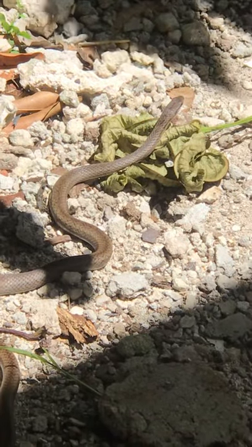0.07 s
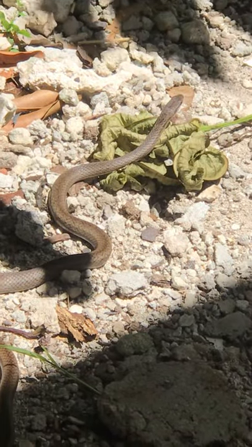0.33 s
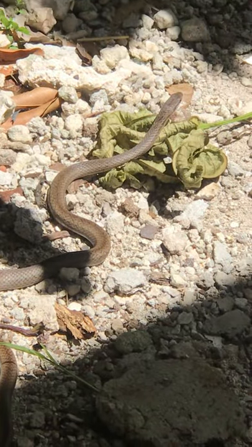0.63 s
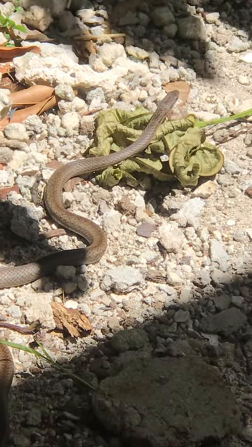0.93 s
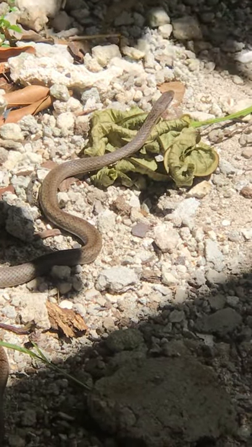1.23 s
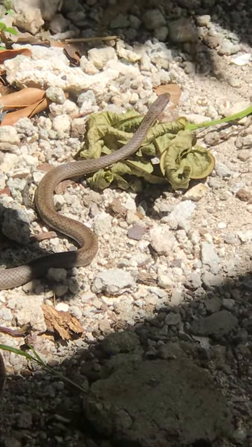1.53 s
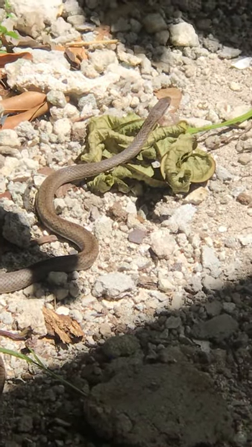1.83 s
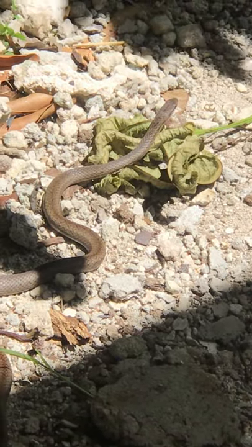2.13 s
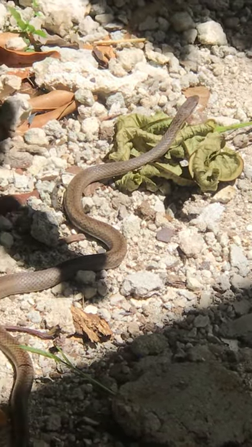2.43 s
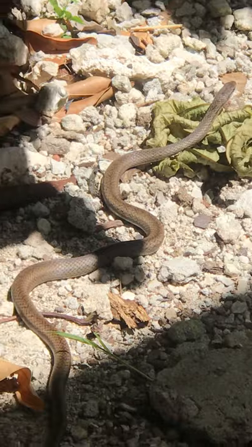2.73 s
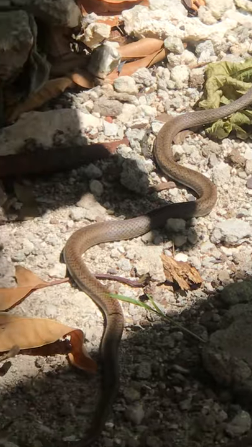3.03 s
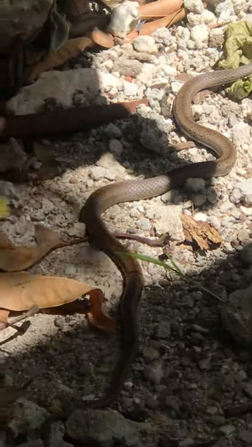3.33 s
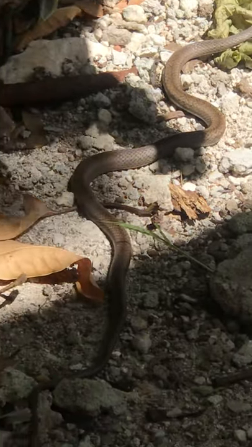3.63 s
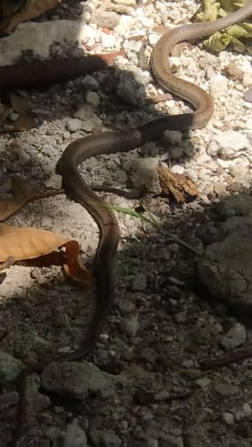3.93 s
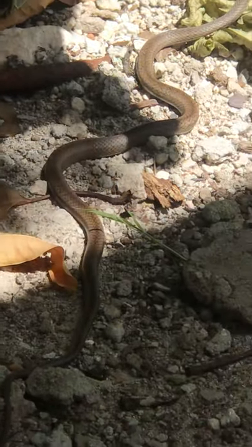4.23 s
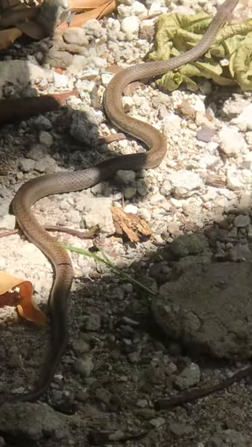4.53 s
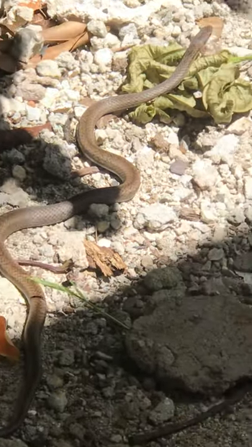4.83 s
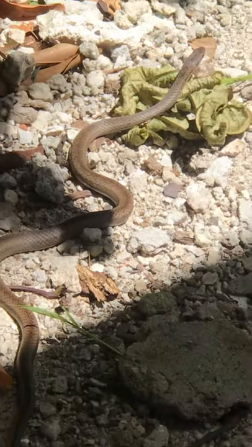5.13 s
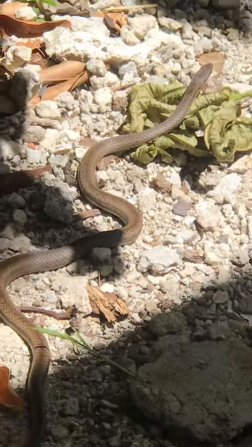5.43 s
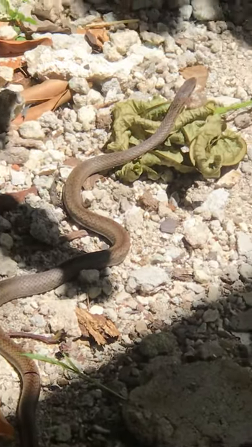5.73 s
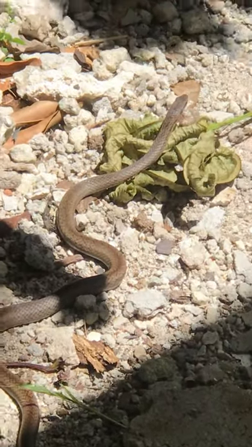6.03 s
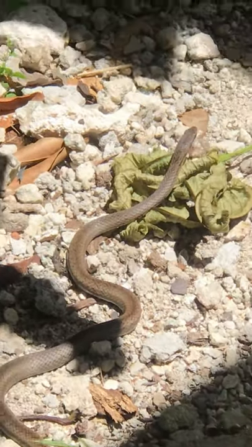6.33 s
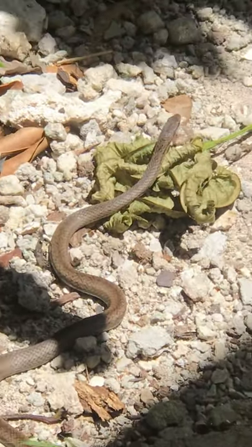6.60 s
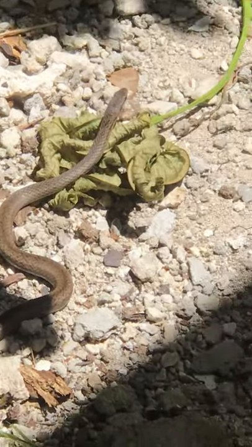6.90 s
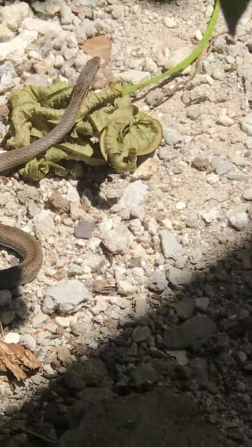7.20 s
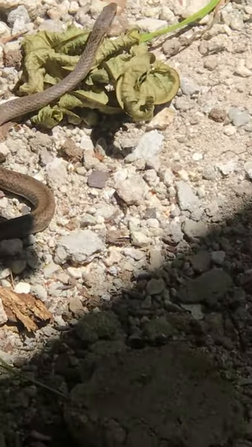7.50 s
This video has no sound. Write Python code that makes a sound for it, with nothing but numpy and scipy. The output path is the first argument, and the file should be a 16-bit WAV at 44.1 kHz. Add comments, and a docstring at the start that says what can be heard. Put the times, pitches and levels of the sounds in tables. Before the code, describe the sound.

Wind tumbles over a hand-held microphone outdoors, starting with a couple of dull bumps and settling into a low, fluttering rumble over a quiet hiss of leaves. Past the halfway point the gusts and thumps bunch up, joined by a few small ticks of gravel and dry leaves. As the breeze drops, faint, very high chirps and a short distant whistle, perhaps a bird, are barely heard.

```python
"""Outdoors over gravel and dry leaves, at a hand-held microphone in a light breeze.
Turbulent air tumbles over the microphone: its pressure fluctuations make a rumble, and single
eddies make soft low thumps. Behind them distant foliage gives a steady broadband hiss.
A few dry ticks of grit and leaves, most of them late, die away as bursts of noise.
Toward the end come faint, very high resonant chirps and one far whistle, nearly a pure tone."""
import sys
import numpy as np
from scipy import signal
from scipy.fft import rfft, irfft, next_fast_len
from scipy.io import wavfile
from scipy.ndimage import uniform_filter1d, map_coordinates

SR = 44100
rng = np.random.default_rng(int(sys.argv[2]) if len(sys.argv) > 2 else 0)


def wav_out(sig):
    """Save sig, one row per channel (or a flat mono array), as 16-bit PCM at SR to the path in sys.argv[1]."""
    wavfile.write(sys.argv[1], SR, np.round(np.clip(np.atleast_2d(sig).T, -1, 1) * 32767).astype(np.int16))


N = 337806


def amp(db):
    """Amplitude ratio of a level in decibels."""
    return 10 ** (np.asarray(db) / 20)


def unit(x):
    """Normalisation to rms 1."""
    return x / np.sqrt(np.mean(x ** 2) + 1e-20)


def clock():
    """The time of every sample in seconds."""
    return np.arange(N) / SR


def curves(rows):
    """Linear interpolation: one value per sample for each column after the time."""
    times, *columns = np.transpose(rows)
    return [np.interp(clock(), times, column) for column in columns]


def wobble(rate_hz):
    """Slow random modulation: a spline through rate_hz Gaussian values a second."""
    return map_coordinates(rng.standard_normal(int(N * rate_hz / SR) + 4), [clock() * rate_hz])


def filtered(x, response):
    """Linear filtering: the spectrum of x times a frequency response."""
    size = next_fast_len(N + SR // 2)
    return irfft(rfft(x, size) * response(np.fft.rfftfreq(size, 1 / SR)), size)[:N]


def rush(spectrum, patchy_db):
    """Coloured noise of rms 1, modulated in random patches of time and frequency."""
    white = signal.stft(rng.standard_normal(N), nperseg=512)[2]
    patches = uniform_filter1d(rng.standard_normal(white.shape), size=8, axis=0)
    patches = uniform_filter1d(patches, size=16, axis=1)
    noise = signal.istft(white * amp(patchy_db * unit(patches)), nperseg=512)[1][:N]
    knots_hz, db = np.transpose(spectrum)
    return unit(filtered(noise, lambda hz: amp(np.interp(np.log(hz + 1), np.log(knots_hz), db))))


def foliage(wash_gain_db=3, hiss_gain_db=2):
    """Flow noise: a dull far wash and the finer hiss of leaves swell with the breeze."""
    # swell of the two bands, before their gains: time_s, wash_db, hiss_db
    swell = [(0.0, -54.5, -57.5), (0.89, -53, -55), (2.2, -55.5, -59), (3.16, -54.5, -58),
             (3.5, -53.5, -56), (4.05, -52.5, -54.5), (4.88, -54.5, -56), (5.4, -55.5, -57.5),
             (7.17, -58, -60.5), (7.66, -57, -62.5)]
    # relative spectral densities: frequency_hz, level_db
    wash_spectrum = [(60, 7), (150, -3), (350, 1.5), (620, 3), (780, 1), (1050, 2.5), (1500, -3),
                     (2200, -10), (4000, -27), (9000, -41)]
    hiss_spectrum = [(400, -31), (1500, 1), (2800, 1.5), (4400, -0.5), (5000, -4), (5500, -3), (6900, -4.5),
                     (7500, -7.5), (8300, -6.5), (9700, -9), (10500, -13.5), (11300, -9.5), (14000, -10.5),
                     (15800, -14)]
    wash_db, hiss_db = curves(swell)
    wash = amp(wash_db + wash_gain_db) * rush(wash_spectrum, patchy_db=0.74)
    hiss = amp(hiss_db + hiss_gain_db + 0.44 * wobble(11)) * rush(hiss_spectrum, patchy_db=0.66)
    return wash + hiss


def whistle(waver_hz=9):
    """A faint pure tone with slight random frequency modulation, perhaps a distant bird."""
    # course of the note: time_s, pitch_hz, level_db
    note = [(7.14, 1458, -80), (7.21, 1457, -58), (7.28, 1456, -57), (7.35, 1440, -77)]
    pitch_hz, level_db = curves(note)
    sounding = (clock() > note[0][0]) & (clock() < note[-1][0])
    phase = 2 * np.pi * np.cumsum(pitch_hz + waver_hz * wobble(60)) / SR
    return sounding * amp(level_db) * np.sin(phase)


def chirps(scratch_db=2.0, fade_s=0.027, undertone_width_hz=190):
    """Noise-driven resonance: faint rasps, perhaps an insect, ring near the top of hearing."""
    # single rasps: peak_s, level_db, rise_s, undertone_hz, undertone_gain_db
    rasps = [(5.735, -52.5, .022, 11800, -2), (6.25, -57, .025, 11400, -8), (6.4, -59, .008, 11400, -12),
             (6.513, -53, .005, 11400, -12), (7.142, -57, .02, 11420, -6), (7.26, -51, .008, 11420, -5)]
    # resonances common to all rasps: centre_hz, width_hz, gain_db
    shared_modes = [(14260, 190, -1), (14660, 210, 0), (15360, 200, -3)]
    out, t = np.zeros(N), clock()
    for peak_s, level_db, rise_s, undertone_hz, undertone_gain_db in rasps:
        modes = [(undertone_hz, undertone_width_hz, undertone_gain_db)] + shared_modes
        body = lambda hz: sum(amp(db) / (1 + (2 * (hz - centre) / width) ** 2)
                              for centre, width, db in modes)
        swell = amp(level_db) * np.exp(-np.maximum((peak_s - t) / rise_s, (t - peak_s) / fade_s))
        out += swell * unit(filtered(rng.standard_normal(N), body))
    return out * amp(scratch_db * wobble(150))


def ticks():
    """Damped transients: grit and leaves give noise bands that start at once and decay exponentially."""
    # snaps and scuffs: start_s, level_db, centre_hz, width_octaves, t60_s
    snaps = [(0.804, -45.5, 850, 1.02, 0.69), (1.335, -58.5, 7000, .7, 0.35),
             (5.213, -58, 8750, .15, 0.077), (5.376, -39, 4960, 0.48, 0.017),
             (5.376, -42, 1300, 0.46, 0.036), (5.519, -38.5, 1300, 0.8, 0.042),
             (5.68, -59, 10100, .06, .15), (6.162, -45.5, 4500, 3, 0.036), (6.203, -51.5, 12500, .3, .07),
             (6.236, -51, 3400, 0.8, 0.11)]
    out, t = np.zeros(N), clock()
    for start_s, level_db, centre_hz, width_octaves, t60_s in snaps:
        band = lambda hz: np.exp(-.5 * (np.log2((hz + 1) / centre_hz) / width_octaves) ** 2)
        decay = (t >= start_s) * amp(level_db - 60 * np.abs(t - start_s) / t60_s)
        out += decay * unit(filtered(rng.standard_normal(N), band))
    return out


def gust(start_s, length_s, rise_s=0.013, fall_s=0.012):
    """Envelope of a gust: exponential growth up to start_s, a plateau, then exponential decay."""
    t = clock()
    return np.exp(-np.maximum(start_s - t, 0) / rise_s - np.maximum(t - start_s - length_s, 0) / fall_s)


def buffeting(breeze_swirl_db=-14.5, rumble_flutter_db=1.35, swirl_flutter_db=3.0):
    """Turbulence at the microphone port: breeze and gusts are incoherent, so they add in power."""
    # the steady breeze: time_s, rumble_db
    breeze = [(0.0, -38.5), (1.15, -44), (1.5, -46.5), (2.45, -44.5), (2.75, -53.5), (2.95, -45.5),
              (3.9, -46), (6.25, -42), (6.45, -51), (7.3, -50), (7.66, -45.5)]
    # gusts on top of it: start_s, length_s, rumble_db, swirl_to_rumble_db
    gusts = [(0.0, 0.062, -29.5, -11), (0.208, 0.17, -35.5, -6.5), (0.611, 0.068, -40.5, 0),
             (.78, 0.134, -41.5, -2.5), (.95, 0.12, -39.5, -9.5), (1.714, .11, -39.5, -2.5),
             (1.992, .16, -39, -19), (2.244, .045, -35.5, -4.5), (2.336, 0.15, -43.5, -13),
             (3.23, .13, -45, -9), (3.553, 0.067, -38.5, -24), (4.152, 0.068, -39.5, -26),
             (4.644, 0.23, -37.5, -7.5), (5.005, 0.14, -37, -8.5), (5.149, 0.041, -32.5, 0.5),
             (5.204, 0.063, -33.5, -7), (5.291, .17, -30, -3.5), (5.375, 0.032, -27, 0.5),
             (5.634, .15, -34, -8.5), (5.889, 0.046, -36.5, 1), (6.053, 0.053, -35, -10),
             (6.53, .1, -48.5, -21)]
    # relative spectral densities of the deep rumble and the smaller swirls: frequency_hz, level_db
    rumble_spectrum = [(15, -32), (30, -11), (55, 2.5), (85, -0.5), (130, -9), (200, -20.5), (300, -31),
                       (600, -74), (1500, -110)]
    swirl_spectrum = [(40, -40), (110, 0.5), (195, 2.5), (265, -8.5), (330, -9), (450, -22.5), (800, -36),
                      (2500, -101)]
    flows = [(amp(curves(breeze)[0]), breeze_swirl_db)]
    for start_s, length_s, rumble_db, swirl_db in gusts:
        flows.append((amp(rumble_db) * gust(start_s, length_s), swirl_db))
    rumble_gain = np.sqrt(sum(flow ** 2 for flow, _ in flows))
    swirl_gain = np.sqrt(sum((flow * amp(swirl_db)) ** 2 for flow, swirl_db in flows))
    flutter = wobble(32)  # common to both bands
    rumble = rumble_gain * amp(rumble_flutter_db * flutter) * rush(rumble_spectrum, patchy_db=1.18)
    swirl = swirl_gain * amp(swirl_flutter_db * flutter) * rush(swirl_spectrum, patchy_db=0.1)
    return rumble + swirl


def eddies(sharpness=6, breakup_ratio=1.35, breakup_db=-17, scatter_s=0.011):
    """Turbulent cascade: each eddy is one peaked pressure swing and sheds four smaller, mostly quicker."""
    # eddies that strike the microphone: peak_s, level_db, centre_hz
    thumps = [(0.054, -15.5, 126), (0.085, -11.5, 136), (.225, -24, 170), (.298, -18.5, 98),
              (.711, -22.5, 105), (1.042, -26, 81), (1.264, -21, 108), (1.73, -26, 107), (1.991, -22.5, 90),
              (2.242, -19, 88.5), (3.339, -26, 89), (4.272, -20.5, 91), (4.394, -16, 149),
              (5.138, -21.5, 261), (5.163, -17, 274), (5.298, -17.5, 108), (5.358, -16.5, 181),
              (5.396, -14, 119), (5.404, -19, 308), (5.415, -20, 71), (5.504, -11.5, 251),
              (5.517, -19.5, 86), (5.916, -20, 125), (6.109, -22, 79), (6.342, -22, 70.4),
              (6.691, -30.5, 88)]
    out, t = np.zeros(N), clock()
    for peak_s, level_db, centre_hz in thumps:
        near = np.abs(t - peak_s) < .08
        offspring = [(peak_s + scatter_s * late,
                      level_db + breakup_db + 2 * loud,
                      centre_hz * breakup_ratio * np.exp(0.27 * small))
                     for late, loud, small in rng.standard_normal(size=(4, 3))]
        for when_s, db, hz in [(peak_s, level_db, centre_hz)] + offspring:
            passage = 2 * np.pi * hz * (t[near] - when_s) / sharpness
            phasor = np.exp(2j * np.pi * rng.random())
            out[near] += amp(db) * np.real(phasor / (1 - 1j * passage) ** sharpness)
    return out


def scene():
    """Superposition: the pressures of all sources add at one microphone."""
    return (foliage() + buffeting() + eddies() + ticks() + chirps() + whistle())[None]


def record(dry, low_cut_hz=36, top_hz=15850):
    """Band limiting: the microphone is a second-order high-pass, and nothing above top_hz is kept."""
    low_cut = lambda hz: (1j * hz) ** 2 / (low_cut_hz ** 2 - hz ** 2 + 1j * hz * low_cut_hz)
    return np.array([filtered(channel, lambda hz: low_cut(hz) * (hz < top_hz)) for channel in dry])


dry = scene()
out = record(dry)
wav_out(out)
```